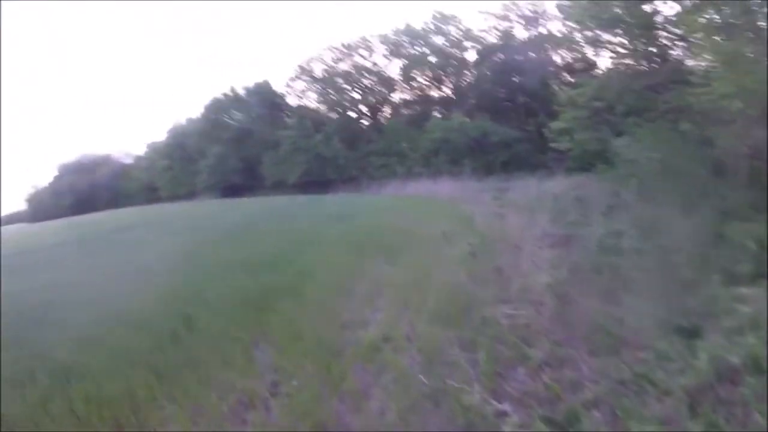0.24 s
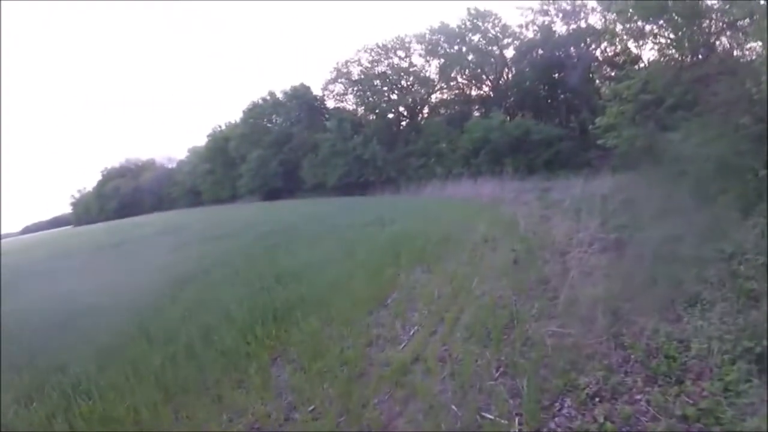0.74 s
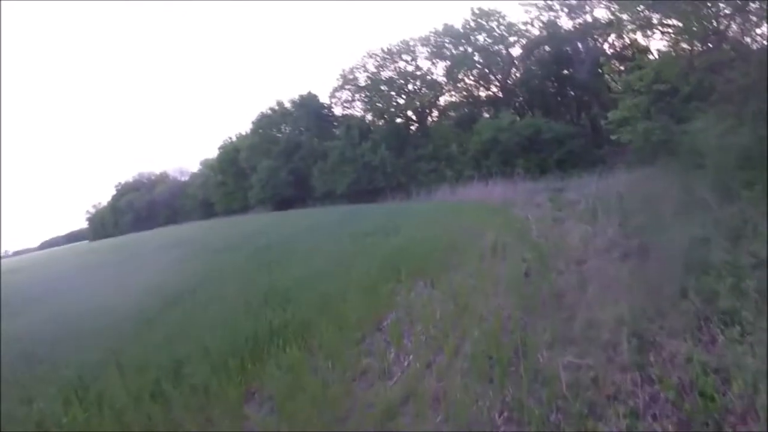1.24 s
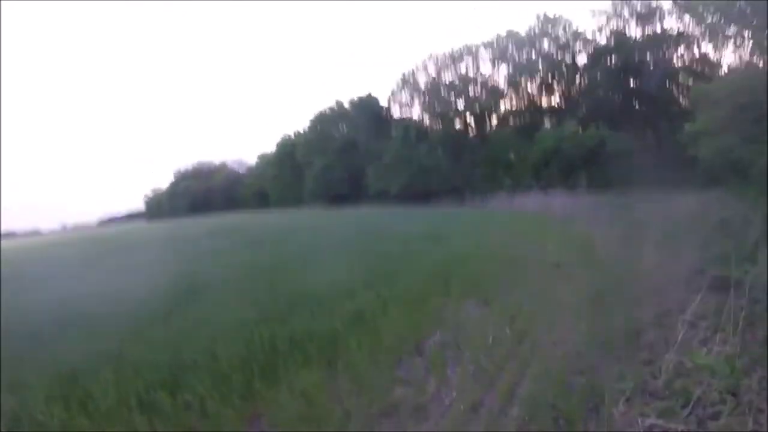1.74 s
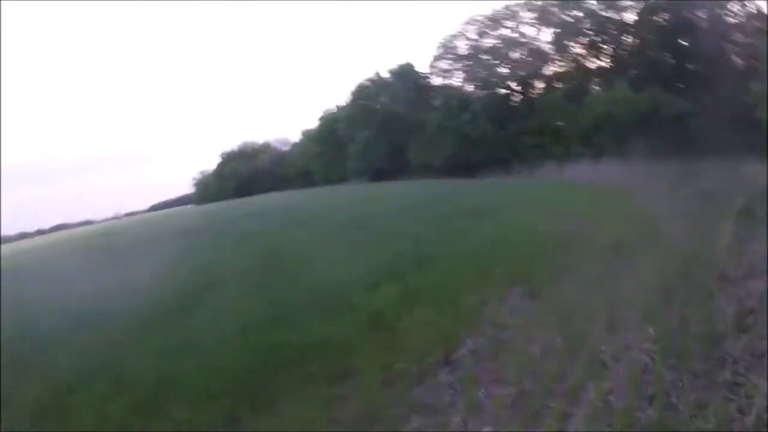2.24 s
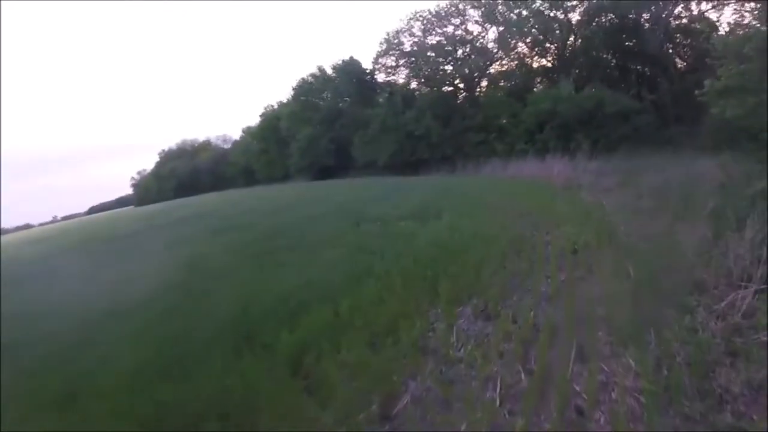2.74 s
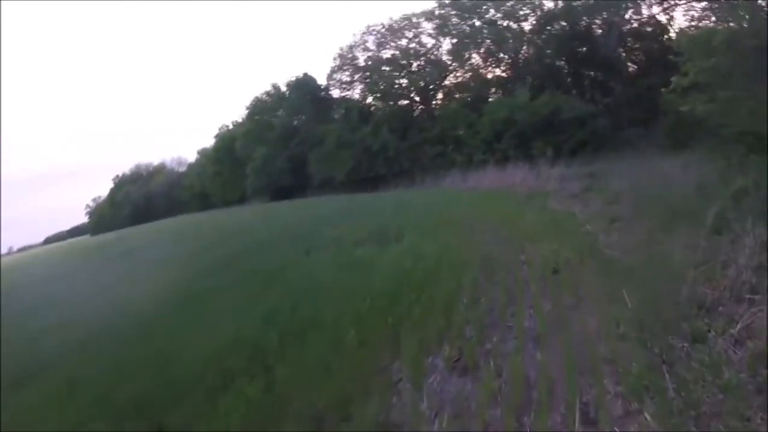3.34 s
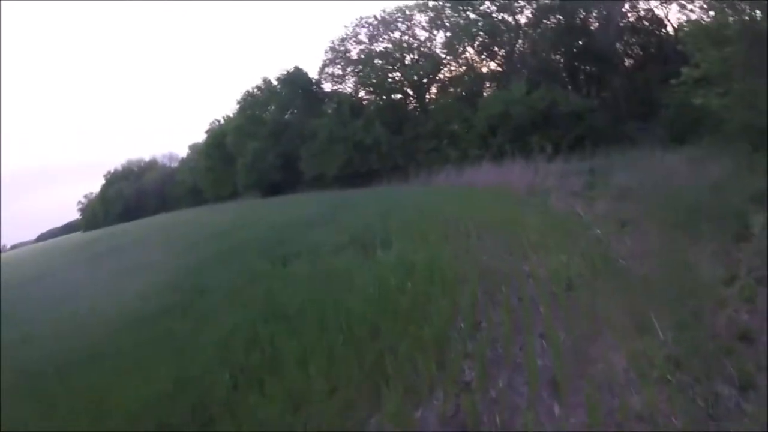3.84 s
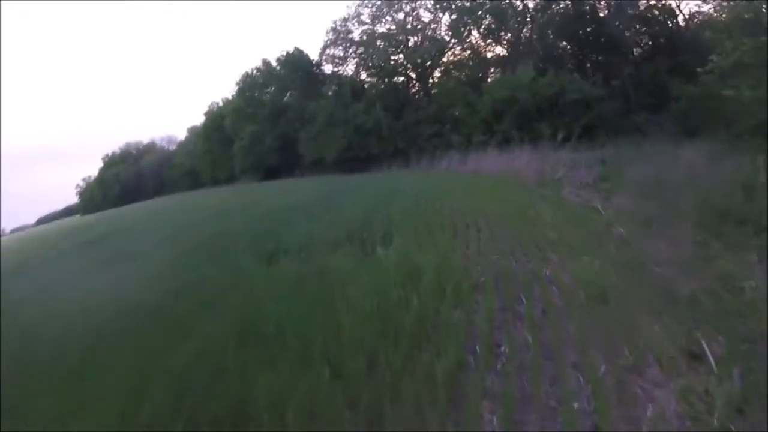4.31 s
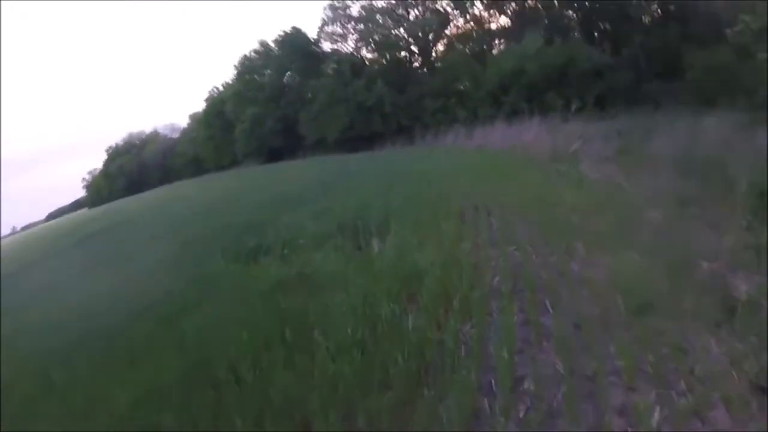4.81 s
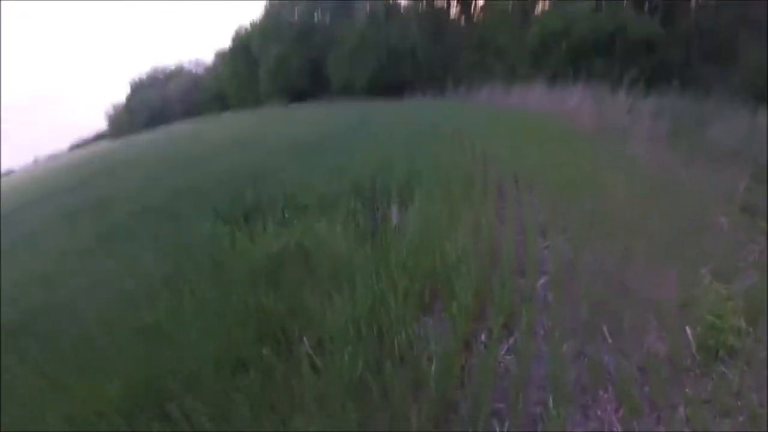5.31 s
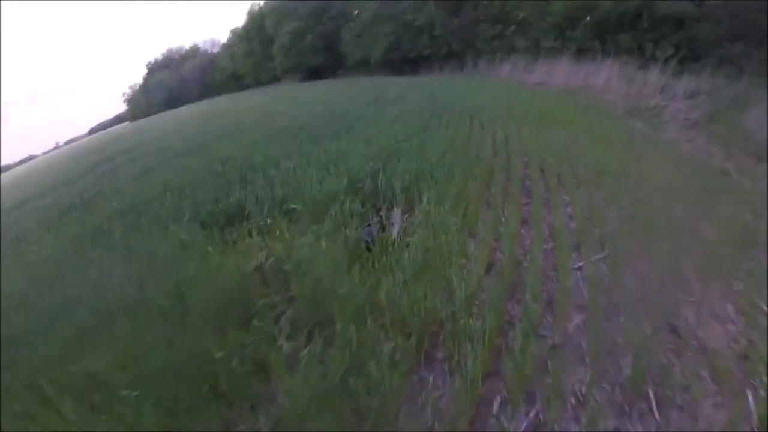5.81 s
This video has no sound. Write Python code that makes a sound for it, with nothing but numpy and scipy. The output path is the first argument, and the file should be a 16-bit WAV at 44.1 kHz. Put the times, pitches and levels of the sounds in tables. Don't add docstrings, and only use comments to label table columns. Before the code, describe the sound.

A person walks steadily along a grassy field, heard from a camera strapped to the body in a closed housing. A distant bird chirps quickly in the first second, then stops. Low, boomy step thumps come roughly every 0.6 seconds, growing hardest past the middle, with rumble, cloth rustle, grass swishes, dull strap bumps, hard buckle knocks and a few dry stem snaps over gritty hiss.

```python
import sys
import numpy as np
from scipy import signal
from scipy.fft import rfft, irfft, next_fast_len
from scipy.io import wavfile
from scipy.ndimage import uniform_filter1d

SR = 44100
rng = np.random.default_rng(int(sys.argv[2]) if len(sys.argv) > 2 else 0)


def gain_from_decibels(decibels):
    exponent = np.asarray(decibels, float) / 20
    return 10 ** exponent


def store_wav(level_fs):
    pcm = np.round(np.clip(np.atleast_2d(level_fs), -1, 1) * 32767)
    wavfile.write(sys.argv[1], SR, pcm.T.astype(np.int16))


N = 267378


def evened(x):
    return x / np.sqrt(np.mean(x ** 2) + 1e-20)


def add(mix, s, sound):
    part = mix[round(s * SR):][:len(sound)]
    part += sound[:len(part)]


def coloured(x, points):
    hz, db = np.transpose(points)
    size = next_fast_len(N)
    bin_hz = np.fft.rfftfreq(size, 1 / SR)
    shape_db = np.interp(np.log(bin_hz + 1), np.log(hz + 1), db, left=-90, right=-90)
    return evened(irfft(rfft(x, size) * gain_from_decibels(shape_db), size)[:N])


def lumpy(per_s, depth_db):
    lumps = evened(uniform_filter1d(rng.standard_normal(N), int(SR / per_s)))
    return rng.standard_normal(N) * gain_from_decibels(depth_db * lumps)


def patchy(frames, bins, depth_db):
    a, b, patches = rng.standard_normal((3, N // 64 + 8, 129))
    patches = uniform_filter1d(patches, frames, 0)
    patches = evened(uniform_filter1d(patches, bins, 1))
    spectrum = (a + 1j * b) * gain_from_decibels(depth_db * patches)
    return signal.istft(spectrum.T, nperseg=256, noverlap=192)[1][:N]


# start_s, level_db (over the usual)
STIR = [(0, 3), (.4, 2.5), (.95, 2), (1.35, -1.5), (2.0, -0.5), (2.6, 0.5), (3.1, 1), (3.5, -1),
        (3.85, -0.5), (4.15, 2), (4.45, -2), (5.05, 2), (5.5, 2), (6.06, 1.5)]
# peak_s, length_s, cloth_level_db, grass_level_db
BRUSHES = [(0, 0.049, -61, -52.5), (0.096, 0.031, -70, -54.5), (0.206, 0.021, -58.5, -62.5),
           (0.353, 0.02, -65, -59), (0.612, 0.021, -65, -59), (1.62, 0.052, -60, -59.5),
           (2.182, 0.073, -68, -63), (2.416, 0.046, -57, -59.5), (2.775, 0.072, -69, -63),
           (2.978, 0.065, -71, -61.5), (3.132, 0.053, -63, -73), (3.971, 0.028, -59.5, -58),
           (4.067, .04, -70, -60), (4.6, .045, -61.5, -57), (5.157, 0.04, -54.5, -55),
           (5.257, 0.072, -63, -56.5), (5.648, 0.047, -56.5, -55), (5.8, 0.043, -55.5, -51.5),
           (5.912, 0.031, -61, -53.5), (5.992, 0.062, -63, -60)]


def motion(usual_db, share, column=None):
    t = np.arange(0, N, 64) / SR
    power = gain_from_decibels(usual_db + share * np.interp(t, *np.transpose(STIR))) ** 2
    for row in BRUSHES if column else []:
        late = (t - row[0]) / row[1]
        late = np.where(late < 0, late / 0.9, late)
        power = power + (gain_from_decibels(row[column]) * np.exp(-late ** 2 / 2)) ** 2
    return np.interp(np.arange(N) / SR, t, np.sqrt(power))


# hz, level_db (per Hz)
RUMBLE = [(7.1, -26), (12, -4), (57, 0), (141, -19.5), (189, -23), (226, -25.5), (277, -25.5), (400, -31.5),
          (520, -34), (880, -120)]


def housing_rumble():
    return gain_from_decibels(4.5) * motion(usual_db=-52.5, share=0.4) * coloured(lumpy(30, 2.37), RUMBLE)


# hz, level_db (per Hz)
RUSTLE = [(88, -41.5), (150, -12), (183, 1), (423, -4.5), (464, 0.5), (1100, -4), (1310, -6), (2500, -15),
          (3250, -44.5), (5500, -120)]


def cloth_rustle():
    friction = coloured(patchy(frames=6, bins=4, depth_db=4.5), RUSTLE)
    return gain_from_decibels(-2.6) * motion(usual_db=-63.5, share=1.1, column=2) * friction


def stems():
    per_s, spread_db = 280, 5
    chance, size, sign = rng.random((3, N))
    return evened((chance < per_s / SR) * gain_from_decibels(-spread_db * np.log(size + .02)) * (sign - .5))


# hz, level_db (per Hz)
SWISH = [(1760, -50), (3000, -13.5), (4420, -23), (4990, -17.5), (5860, -14), (6500, 2), (7250, -9.5),
         (8800, -11.5), (10100, -27.5), (11200, -22), (14000, -26.5)]


def grass_swish():
    blades = evened(patchy(frames=4, bins=40, depth_db=2.0)[:N])
    grass = coloured(blades + gain_from_decibels(-9.5) * stems(), SWISH)
    return gain_from_decibels(-1.5) * motion(usual_db=-63.5, share=0.42, column=3) * grass


def whistle(rows):
    s, hz, db = np.transpose(rows)
    t = np.arange(s[0], s[-1], 1 / SR)
    tone = np.sin(2 * np.pi * np.cumsum(np.interp(t, s, hz)) / SR)
    return s[0], np.sqrt(2) * gain_from_decibels(np.interp(t, s, db)) * tone * signal.windows.tukey(len(t), .15)


# start_s, pitch_hz, level_db
OPENING = [
    [(0, 5220, -48.5), (.015, 5550, -54), (.022, 4490, -71.5), (.032, 4040, -67.5), (.048, 4020, -59.5)],
    [(.128, 2980, -70), (.141, 3110, -67.5), (.166, 4040, -63.5), (.19, 4626, -62.5), (.212, 5400, -56),
     (.219, 5050, -57), (.224, 4480, -70), (.235, 4020, -62.5), (.246, 3920, -62)],
]
# start_s, pitch_hz, level_db
PHRASE = [
    [(0, 5520, -64), (.005, 6300, -51), (.012, 7300, -70)],
    [(.009, 4900, -58.5), (.016, 6000, -50), (.023, 7100, -54)],
    [(.025, 4950, -60), (.033, 5030, -56.5), (.04, 4300, -67), (.047, 3300, -63)],
    [(.071, 2740, -74), (.078, 2940, -65), (.089, 3330, -61.5), (.103, 3480, -62), (.145, 3595, -65.5),
     (.2, 3580, -72), (.27, 3570, -78)],
]
# start_s, level_db
PHRASE_AT = [
    (.334, -2),
    (0.595, -1.5),
]
# start_s, pitch_hz, level_db
FAR = [
    [(2.76, 3470, -73), (2.8, 3600, -81), (2.85, 3530, -74)],
    [(4.2, 2790, -82), (4.4, 2890, -76), (4.48, 2800, -77.5)],
]


def bird():
    song = np.zeros(N)
    for rows in OPENING + FAR:
        add(song, *whistle(rows))
    for start, db in PHRASE_AT:
        for rows in PHRASE:
            s, note = whistle(rows)
            add(song, start + s, gain_from_decibels(db) * note)
    t = np.arange(SR) / SR
    trees = rng.standard_normal(len(t)) * gain_from_decibels(-60 * t / 1.1) * (t > .004)
    return song + gain_from_decibels(-6.0) * signal.oaconvolve(song, trees / np.linalg.norm(trees))[:N]


# hz, level_db (per Hz)
HISS = [(88, -24.5), (150, 1), (189, -29.5), (293, -4), (329, -10), (399, -9), (502, -13.5), (859, -16.5),
        (1120, -18), (1240, -15.5), (2610, -18.5), (4380, -34), (6560, -20), (11900, -27), (14700, -37.5)]


def self_noise():
    return gain_from_decibels(-63.5) * coloured(rng.standard_normal(N), HISS)


LEAD_S = 0.12


def jolt(db, hz, rise, fall, slowing):
    t = np.arange(-LEAD_S, .2, 1 / SR)
    lead = t * (1 + (t / 0.087) ** 2)
    rebound = t * (slowing + (1 - slowing) * np.exp(-abs(t) / 0.0066))
    angle = 2 * np.pi * hz * np.where(t < 0, lead, rebound)
    onset = np.exp(-.8 * abs(t) / rise - (t / rise / 1.35) ** 8)
    swing = np.where(t < 0, onset, np.exp(-(abs(t) / fall) ** 1.5))
    return -gain_from_decibels(db) * swing * np.cos(angle + 0.25 * np.sin(angle))


# peak_s, level_db, swing_hz, length_s, direction (1 down, -1 up)
SWAYS = [(0.159, -38, 27, 0.0098, -1), (.815, -42.5, 90, 0.021, -1), (0.875, -41, 163, 0.0045, -1),
         (0.886, -30.5, 65, 0.0046, -1), (0.911, -40, 33, 0.011, -1), (0.959, -45, 98, 0.028, -1),
         (.993, -43, 39, .01, -1), (1.01, -32, 105, 0.006, -1), (1.03, -39, 125, 0.011, -1),
         (1.847, -31.5, 20, 0.021, 1), (2.519, -37, 24, 0.045, 1), (3.21, -27.5, 65, 0.0044, -1),
         (3.683, -28.5, 21.3, 0.027, 1), (4.132, -32, 18.6, 0.03, 1), (4.272, -33, 27, 0.026, 1),
         (4.759, -42, 126, 0.011, -1), (4.889, -39, 99, 0.017, -1), (4.906, -35.5, 41, 0.033, 1),
         (2.0, -45.5, 99, 0.019, 1), (5.416, -33, 17.2, 0.053, 1), (5.744, -33.5, 77, 0.013, -1),
         (6.003, -26, 24, 0.051, 1)]


def housing_sways():
    out = np.zeros(N)
    for s, db, hz, length, direction in SWAYS:
        add(out, s - LEAD_S, np.sign(direction) * jolt(db, hz, length, length, 1))
    return out


def struck_shell(rows):
    out, t = np.zeros(N), np.arange(4000) / SR
    for s, db, hz, t60, edge_db in rows:
        ring = gain_from_decibels(-60 * t / t60) * np.sin(2 * np.pi * hz * t)
        edge = gain_from_decibels(edge_db - 60 * t / 0.0031) * np.sin(2 * np.pi * 790 * t)
        add(out, s, gain_from_decibels(db) * (ring + edge) * (1 - np.exp(-t / 0.00023)))
    return signal.sosfilt(signal.butter(4, 1696, fs=SR, output='sos'), out)


# start_s, level_db, ring_hz, t60_s
THUDS = [(.045, -47, 600, .05), (0.0542, -43.5, 716, 0.012), (.0682, -31, 715, 0.0094),
         (.0722, -36.5, 688, 0.018), (.082, -37.5, 685, 0.01), (.092, -49, 834, 0.019),
         (0.454, -47, 550, 0.037), (.72, -48, 520, 0.044), (1.789, -43.5, 293, 0.13),
         (2.432, -43.5, 1360, .02), (2.523, -44.5, 293, 0.13), (2.938, -38.5, 300, 0.035),
         (4.178, -42, 216, 0.027), (4.57, -42.5, 1190, 0.01), (4.916, -53.5, 1314, .12),
         (4.945, -45.5, 530, 0.056), (5.015, -57.5, 1320, .1), (5.14, -54.5, 1307, .1),
         (5.165, -47, 677, .02), (5.224, -48, 760, .03), (5.287, -34.5, 257, 0.017),
         (5.59, -51.5, 904, 0.055), (5.77, -46, 535, 0.031)]


def strap_thuds():
    return struck_shell([(s, db, hz, t60, -20) for s, db, hz, t60 in THUDS])


# deepest_s, level_db, swing_hz, fall_s, slowing (rebound factor)
STEPS = [
    (0.2, -29.5, 25.2, 0.06, 0.72),
    (1.071, -16, 27.9, 0.025, 0.57),
    (1.79, -16.5, 28.95, 0.021, 0.49),
    (2.401, -16.5, 27.3, 0.03, 0.66),
    (2.943, -13.5, 28.3, 0.026, 0.52),
    (3.616, -13.5, 26.9, 0.023, 0.76),
    (4.207, -12.5, 27.7, .024, 0.57),
    (4.805, -13.6, 28, 0.029, 0.7),
    (5.313, -15.5, 25.9, 0.029, 0.61),
    (5.946, -18.5, 24.7, 0.039, 0.88),
]


def heel_strikes():
    out = np.zeros(N)
    for s, db, hz, fall, slowing in STEPS:
        add(out, s - LEAD_S, jolt(db, hz, 0.028, fall, slowing))
    return out


# hz, level_db (per Hz)
CRUNCH = [(70, -15.5), (110, -0.5), (250, -0.5), (400, -9), (900, -23), (1500, -44)]


def soil_crunch(jolts):
    load = uniform_filter1d(abs(jolts), size=900)
    return gain_from_decibels(-30) * load * coloured(lumpy(80, 2.7), CRUNCH)


# start_s, level_db, ring_hz, t60_s, edge_level_db
KNOCKS = [(2.101, -46, 810, 0.009, 9), (2.41, -44.5, 393, 0.011, 2), (2.561, -41.5, 497, 0.0035, 11.5),
          (2.66, -57, 1020, 0.013, 19), (3.1598, -37.5, 1015, 0.003, 2), (3.594, -21.5, 229, 0.019, -11),
          (4.199, -41.5, 510, 0.015, 1), (4.786, -17.5, 246, 0.013, -1.5), (5.235, -40, 840, 0.011, -8),
          (5.26, -45, 555, 0.026, -1), (5.282, -46, 1470, 0.0043, -1), (5.3608, -32.5, 950, 0.0038, 3)]


def buckle_knocks():
    return struck_shell(KNOCKS)


# start_s, level_db
SNAPS = [
    (2.486, -49),
    (2.957, -50),
    (3.973, -51),
    (5.26, -47),
    (4.529, -56),
    (5.592, -55),
]


def stem_snaps():
    out = np.zeros(N)
    for s, db in SNAPS:
        out[round(s * SR)] = gain_from_decibels(db + 15.5)
    port = signal.lfilter(*signal.iirpeak(6500, 4., SR), out)
    return signal.lfilter(*signal.butter(2, [900, 7500], 'band', fs=SR), out) + port


def scene():
    jolts = housing_sways() + heel_strikes()
    blows = strap_thuds() + buckle_knocks()
    layers = housing_rumble() + cloth_rustle() + grass_swish()
    return (layers + bird() + jolts + soil_crunch(jolts) + blows + stem_snaps())[None]


# hz, level_db
USUAL_STEP = [(0, -8.), (1000, 4.), (4300, 9.), (7000, 3.), (10300, 11.), (11500, 9.), (14800, 13.)]
# edge_hz (starves above), extra_step_db
STARVED = [(430, 12.5), (750, 13), (1200, 13), (1700, 14.5)]
STARVED_DEEP = [.749, .771, 1.389, 1.539, 3.885, 4.931]
STARVED_LOW = [.045, .28, .813, 1.624, 2.157, 2.84, 3.053, 3.245, 3.48, 4.013, 4.099, 4.376, 5.037, 5.336]
STARVED_MID = [.067, .493, 1.176, 1.24, 1.261, 1.773, 2.691, 2.755, 3.373, 3.821, 3.843, 5.485, 5.827]
STARVED_HIGH = [.216, .451, 1.091, 1.581, 2.435, 3.352, 3.693, 5.571]


def camera_rounding(x):
    hop, first = 941, 94
    n, k = np.arange(2 * hop), np.arange(hop)
    window = signal.windows.kaiser_bessel_derived(2 * hop, 4 * np.pi)
    basis = np.sqrt(2 / hop) * window * np.cos(np.pi / hop * np.outer(k + .5, n + .5 + hop / 2))
    padded = np.pad(x, (2 * hop - first, 2 * hop))
    starts = np.arange(0, len(padded) - 2 * hop, hop)
    lines = padded[starts[:, None] + n] @ basis.T
    hz = (k + .5) * SR / 2 / hop
    level_db = 20 * np.log10(abs(lines) + 1e-9)
    local_db = uniform_filter1d(level_db, size=120, axis=1)
    step_db = local_db + np.interp(hz, *np.transpose(USUAL_STEP))

    jolt_db = np.maximum(level_db.max(1) + 8, 0)
    bands = uniform_filter1d(rng.standard_normal((len(starts), 60)), size=3, axis=0)[:, k // 16]
    step_db += (9 * bands + .45 * jolt_db[:, None]) * (hz / 14000) ** 2
    top_hz = 14550 + 600 * bands[:, 0] - 60 * jolt_db

    kept = np.ones((len(starts), 1))
    lists = (STARVED_DEEP, STARVED_LOW, STARVED_MID, STARVED_HIGH)
    for times, (edge_hz, extra_db) in zip(lists, STARVED):
        starving = hz > edge_hz
        for s in times:
            frame = round((s * SR - first) / hop) + 1
            step_db[frame, starving] = local_db[frame, starving] + 5.5 + extra_db
            step_db[frame] += 5 * (hz / 14000) ** 2
            kept[frame] = np.clip(extra_db / 15, .6, 1)

    rounded = np.round(lines / gain_from_decibels(step_db)) * gain_from_decibels(step_db) * (hz < top_hz[:, None])
    error = kept * (rounded - lines)
    for start, part in zip(starts, error @ basis):
        add(padded, start / SR, part)
    return padded[2 * hop - first:][:N]


def band_limit(x):
    return signal.sosfilt(signal.butter(12, 14820, fs=SR, output="sos"), x)


def record(dry):
    sealed = signal.lfilter(*signal.butter(1, 6, 'high', fs=SR), dry[0])
    mix = camera_rounding(sealed + self_noise())[None]
    return band_limit(mix)


dry = scene()
out = record(dry)
store_wav(out)
```